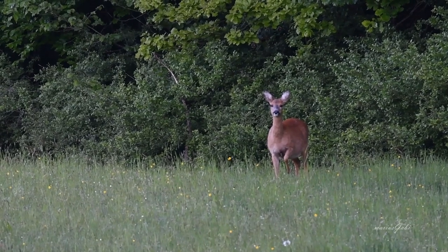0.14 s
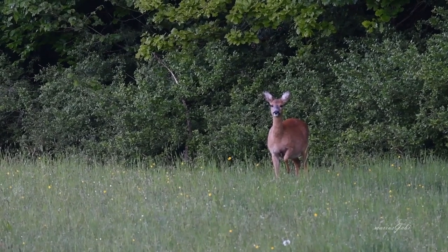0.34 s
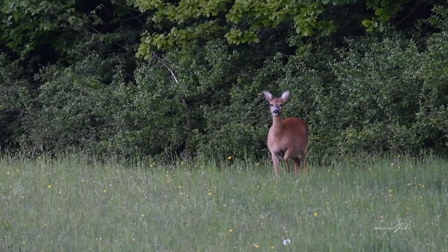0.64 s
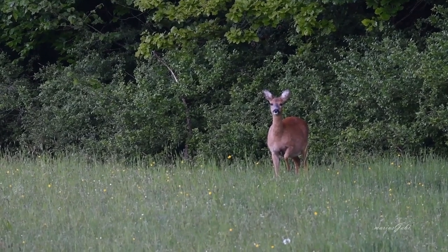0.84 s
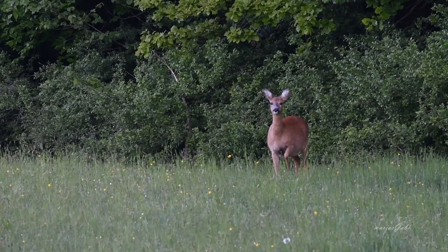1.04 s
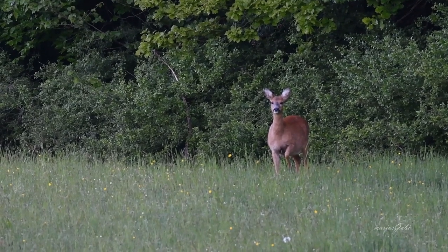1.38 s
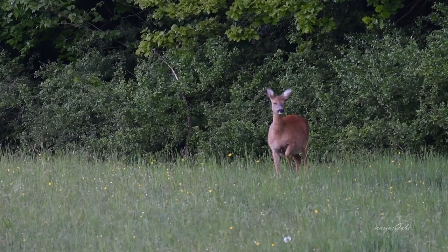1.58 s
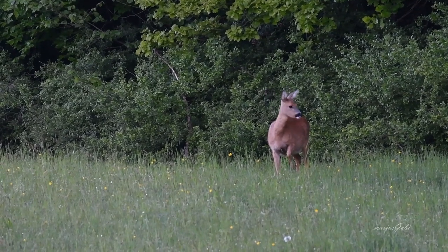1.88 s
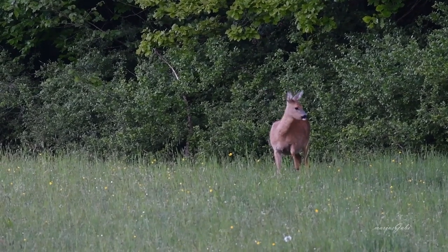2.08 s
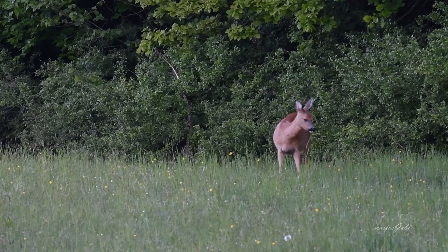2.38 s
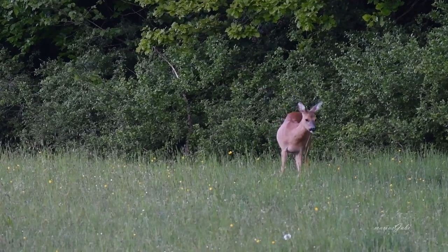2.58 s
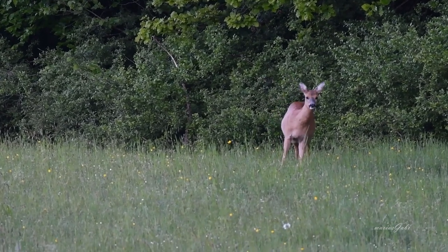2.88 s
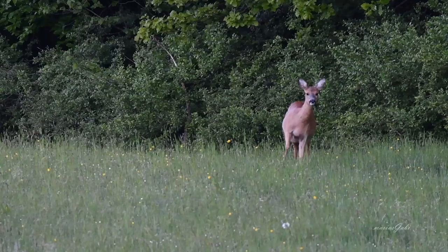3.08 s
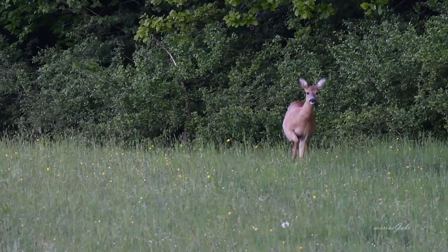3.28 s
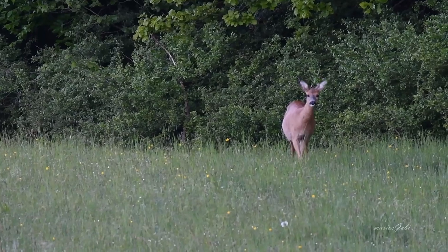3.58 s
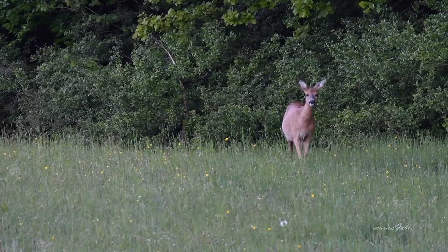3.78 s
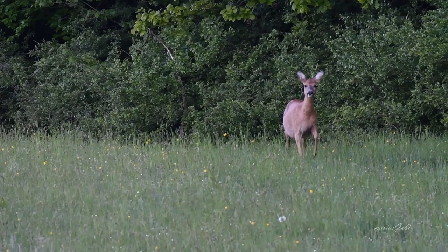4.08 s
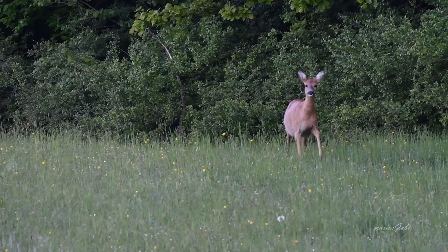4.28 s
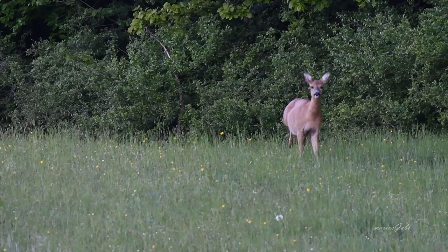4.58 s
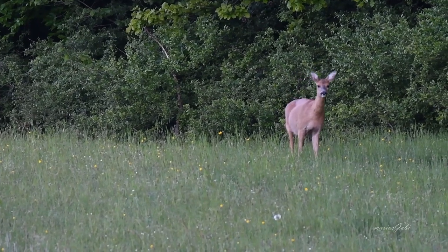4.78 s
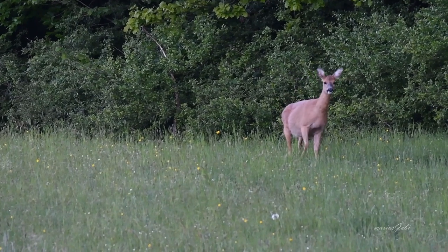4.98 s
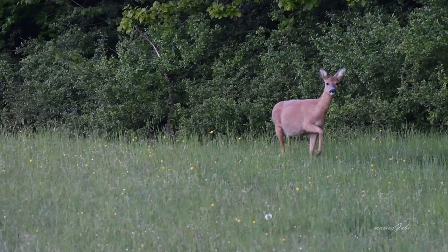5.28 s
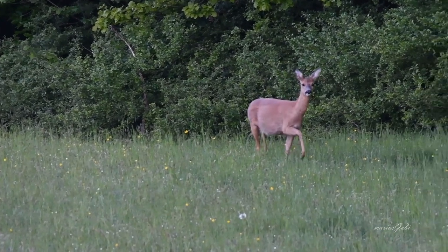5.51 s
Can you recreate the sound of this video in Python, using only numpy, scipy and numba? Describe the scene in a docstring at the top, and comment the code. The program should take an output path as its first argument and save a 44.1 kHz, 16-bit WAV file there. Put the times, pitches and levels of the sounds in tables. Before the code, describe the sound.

A wide stereo outdoor pickup with soft air and microphone hiss. Near and distant songbirds chatter rapidly at first, then give slower, hazier whistles and thin high notes. After this calmer stretch comes one loud, raspy deer bark, under half a second long, sagging in pitch and dulling towards its end. The wood answers with a spreading reverberant tail, and small bird notes follow.

```python
"""A meadow at the edge of a wood: a roe deer gives one hoarse bark, off to the right, and the trees throw it back.
Songbirds near and far sing as gliding whistles, smeared where distant or buzzy; a low call sounds far off.
Uneven throat pulses and gated breath make the bark, with a clean fundamental tone beside them.
A soft noisy haze at 2.9 and 3.7 kHz, made of smeared whistles too, follows the bark.
Below lie bands of noise: a patchy far chorus, faint drones, and the hiss of air and microphones."""
import sys
import numpy as np
from scipy import signal
from scipy.fft import rfft, irfft, next_fast_len
from scipy.io import wavfile
from scipy.ndimage import uniform_filter1d
from numba import njit

SR = 44100
rng = np.random.default_rng(int(sys.argv[2]) if len(sys.argv) > 2 else 0)


def store_pcm(level_fs):
    """Save levels as 16-bit WAV."""
    pcm = np.round(np.clip(level_fs, -1, 1) * 32767).astype(np.int16)
    wavfile.write(sys.argv[1], SR, np.atleast_2d(pcm).T)


N = 249165


def from_db(db):
    """Turn decibels into a gain."""
    return 10 ** (np.asarray(db) / 20)


def rms_one(x):
    """Scale to an rms of 1."""
    return x / np.sqrt(np.mean(x ** 2) + 1e-20)


def in_time(s, length, edge_s):
    """A gate that is open for a while, with straight edges."""
    t = np.arange(N) / SR - s
    return np.clip(np.minimum(t, length - t) / edge_s, 0, 1)


def at_hz(points, hz):
    """Read a table's second column at any frequency, straight over log frequency."""
    table_hz, values = np.transpose(points)
    return np.interp(np.log(hz), np.log(table_hz), values)


def drift(rate_hz, size=N):
    """Slow chance: noise twice through a one-pole low-pass, run in; rms 1."""
    r = np.exp(-2 * np.pi * rate_hz / SR)
    run_in = 4000
    slow = signal.lfilter([1], [1, -2 * r, r * r], rng.standard_normal(size + run_in))
    return rms_one(slow[run_in:])


def stereo(mid, side, alike):
    """Mix two independent noises into left and right with a given likeness."""
    return np.sqrt(1 + alike) * mid + np.sqrt(1 - alike) * side * [[1], [-1]]


@njit
def resonate(x, hz, r, sr):
    """A resonance whose centre moves; gain 1 on top."""
    y = np.zeros(len(x))
    for i in range(2, len(x)):
        driven = (1 - r * r) / 2 * (x[i] - x[i - 2])
        y[i] = driven + 2 * r * np.cos(2 * np.pi * hz[i] / sr) * y[i - 1] - r * r * y[i - 2]
    return y


def air():
    """Hiss of air and microphones: steady stereo noise shaped in level and left-right likeness."""
    # spectrum of the hiss: hz, relative level_db per Hz
    spectrum = [(12, -54), (20, -12.5), (101, 0), (153, -0.5), (316, -4), (441, -3), (582, -6), (885, -6),
                (1270, -8), (1980, -10.5), (3770, -10.5), (6400, -15.5), (7560, -21), (10300, -15),
                (15600, -16)]
    # how alike the two microphones hear it: hz, likeness (1 = identical)
    likeness = [(60, 0.59), (180, 0.48), (550, 0.049), (1650, 0.035), (4970, 0.0093), (15000, 0.019)]
    size = next_fast_len(N)
    hz = np.maximum(np.fft.rfftfreq(size, 1 / SR), 1)
    mid, side = rfft(rng.standard_normal((2, size)))
    both = from_db(at_hz(spectrum, hz)) * stereo(mid, side, at_hz(likeness, hz))
    return from_db(-56.5) * rms_one(irfft(both, size)[:, :N])


def drones():
    """Faint narrow bands of noise with wavering level; the high one is likely insects."""
    # drone bands: centre_hz, width_hz, level_db before the wavering
    drone_bands = [(878, 22, -76.5), (6240, 97, -78.5)]
    out = 0
    for hz, width_hz, level_db in drone_bands:
        r = np.exp(-np.pi * width_hz / SR)
        poles = [1, -2 * r * np.cos(2 * np.pi * hz / SR), r * r]
        band = signal.lfilter([1, 0, -1], poles, rng.standard_normal((2, N)))
        out = out + from_db(level_db + 2.7 * drift(1.5)) * rms_one(band)
    return out


def far_chorus():
    """Many far birds melt into a patchy shimmer: bands of noise that swell and sink on their own."""
    # shimmer bands: centre_hz, level_db (rms of the band before the swells)
    chorus_bands = [(2000, -71.5), (2600, -80), (3400, -75.5), (4400, -80.5), (5700, -75.5)]
    swell_db, swell_hz = 2.5, 3.5
    white = rng.standard_normal((2, N))
    out = 0
    for hz, level_db in chorus_bands:
        sos = signal.butter(4, [hz / 1.102, hz * 1.077], "band", fs=SR, output="sos")
        band = signal.sosfilt(sos, white)
        out = out + from_db(level_db + swell_db * drift(swell_hz)) * rms_one(band)
    return out


def low_call():
    """A wavering coo, blurred by distance: noise through a resonance 40 Hz wide."""
    # low far calls: start_s, length_s, pitch_hz, level_db
    low_calls = [(1.35, 0.5, 271, -64.5), (1.95, 0.17, 265, -63)]
    level = sum(from_db(db) * in_time(s, length, edge_s=.06) for s, length, hz, db in low_calls)
    s, length, hz, db = np.transpose(low_calls)
    pitch_hz = np.interp(np.arange(N) / SR, s + length / 2, hz)
    coo = resonate(rng.standard_normal(N), pitch_hz, np.exp(-np.pi * 40 / SR), SR)
    return level * rms_one(coo)


def bands():
    """Half-octave band filters from 160 Hz up, with their centres."""
    edges = 20 * 2 ** np.arange(3, 10, .5)
    return [(np.sqrt(low * high), signal.butter(2, [low, high], "band", fs=SR, output="sos"))
            for low, high in zip(edges, edges[1:])]


def wood(x, onset_s, early_db, early_t60):
    """Trunks and leaves scatter sound back: a quick near part and a slower tail, alike in the bass only."""
    # dying away of the tail: hz, t60_s (time to fall by 60 dB)
    tail_t60 = [(300, 2.34), (700, 2.08), (1400, 1.89), (2400, 1.34), (4000, 1.26), (8000, 1.25)]
    t = np.arange(int(1.2 * SR)) / SR
    white, echo = rng.standard_normal((2, len(t))), 0
    for hz, sos in bands():
        mid, side = signal.sosfilt(sos, white)
        alike = 1 / (1 + (hz / 700) ** 2)
        tail = from_db(-60 * t / at_hz(tail_t60, hz))
        early = from_db(early_db - 60 * t / early_t60)
        echo = echo + (tail + early) * stereo(mid, side, alike)
    build_up = 1 - np.exp(-t / onset_s)
    return signal.fftconvolve(x, echo * build_up / np.sqrt(SR), axes=-1)[:, :N]


def birds_and_haze():
    """Each note is a gliding whistle, smeared over its blur width if far, buzzy or part of the haze."""
    # bird notes and two strokes of haze: kind, start_s, length_s, start_hz, bend_hz, end_hz, level_db
    notes = [("far", 0.002, 0.035, 2850, 2800, 2870, -52), ("near", 0.01, 0.09, 2350, 2720, 3190, -43.5),
             ("ahead", 0.1, 0.13, 3150, 3180, 3150, -60), ("ahead", 0.155, 0.024, 2330, 2380, 2150, -46),
             ("near", 0.181, 0.14, 3720, 3800, 3880, -53), ("near", 0.245, 0.035, 3780, 3600, 3400, -43),
             ("far", 0.282, 0.04, 3450, 3600, 3650, -47), ("near", 0.311, 0.042, 3150, 2650, 2100, -53),
             ("near", 0.374, 0.057, 3450, 3314, 3100, -44), ("ahead", 0.409, 0.055, 4800, 4560, 4560, -47),
             ("left", 0.46, 0.05, 4500, 4200, 4050, -59), ("far", 0.487, 0.03, 3250, 3230, 3250, -49),
             ("near", 0.522, 0.06, 3300, 3520, 3650, -44), ("buzz", 0.595, 0.06, 3550, 3550, 3400, -47),
             ("far", 0.691, 0.02, 4330, 4000, 3650, -55), ("churr", 0.698, 0.19, 3850, 3800, 3700, -52),
             ("near", 0.841, 0.076, 3680, 3400, 3420, -43), ("far", 0.905, 0.094, 3420, 3430, 3410, -46),
             ("near", 1.012, 0.034, 2100, 2560, 2860, -43.5), ("near", 1.05, 0.016, 3080, 3230, 3170, -41),
             ("far", 1.06, 0.024, 2900, 2800, 2620, -49), ("left", 1.062, 0.026, 3850, 4050, 4300, -51),
             ("near", 1.082, 0.052, 2580, 2310, 2250, -42.5), ("buzz", 1.085, 0.078, 3800, 3800, 3800, -48),
             ("near", 1.187, 0.04, 3300, 3115, 3090, -43), ("near", 1.323, 0.025, 2230, 2560, 2880, -42),
             ("left", 1.34, 0.012, 3800, 4000, 4150, -56), ("ahead", 1.355, 0.033, 4750, 4350, 3950, -54),
             ("near", 1.357, 0.032, 3000, 3080, 3050, -49), ("near", 1.392, 0.036, 3000, 2700, 2300, -46),
             ("far", 1.416, 0.03, 2950, 3050, 3020, -51), ("far", 1.438, 0.018, 2250, 2100, 1950, -53),
             ("far", 1.465, 0.06, 2050, 2000, 1930, -56), ("buzz", 1.442, 0.035, 5800, 5630, 5450, -62),
             ("near", 1.51, 0.03, 3400, 3500, 3200, -51), ("far", 1.54, 0.075, 3050, 3030, 3050, -57),
             ("churr", 1.553, 0.022, 4100, 3900, 3700, -54), ("left", 1.635, 0.02, 3230, 3300, 3500, -51),
             ("buzz", 1.65, 0.03, 3700, 3800, 3650, -48), ("far", 1.798, 0.23, 2050, 2044, 2020, -70),
             ("ahead", 1.898, 0.016, 3220, 3200, 3250, -53), ("churr", 1.974, 0.09, 4450, 4600, 4460, -66),
             ("churr", 2.045, 0.19, 3750, 3715, 3660, -51), ("churr", 2.197, 0.08, 2150, 2050, 1950, -62),
             ("far", 2.243, 0.15, 2163, 1992, 1890, -54), ("far", 2.438, 0.21, 1883, 1769, 1704, -54),
             ("high", 2.628, 0.14, 8500, 8000, 7700, -68.5), ("far", 2.642, 0.15, 2380, 2280, 2116, -52),
             ("high", 2.766, 0.14, 7600, 7340, 7250, -64.5), ("churr", 2.836, 0.035, 6800, 6100, 5600, -67),
             ("far", 2.842, 0.083, 1960, 1930, 1900, -53), ("buzz", 2.84, 0.14, 5520, 5300, 5200, -61.5),
             ("distant", 2.921, 0.11, 4720, 4720, 4780, -53), ("churr", 2.954, 0.45, 4350, 4104, 4000, -58),
             ("left", 3.08, 0.02, 2750, 2830, 2870, -55.5), ("left", 3.118, 0.027, 1450, 1400, 1380, -59),
             ("far", 3.204, 0.18, 2022, 2085, 2200, -66), ("far", 3.331, 0.095, 3020, 3120, 3150, -64),
             ("far", 3.34, 0.17, 2850, 2810, 2780, -61), ("high", 3.467, 0.1, 7400, 7140, 6900, -70),
             ("high", 3.56, 0.24, 6880, 6620, 6530, -61), ("far", 3.588, 0.1, 2370, 2490, 2424, -55.5),
             ("far", 3.727, 0.042, 2480, 2525, 2440, -61), ("distant", 3.744, 0.52, 4390, 4364, 4400, -53),
             ("churr", 3.9, 0.1, 4600, 4660, 4600, -64), ("ahead", 4.117, 0.03, 1400, 1330, 1300, -62.5),
             ("far", 4.15, 0.12, 2850, 2875, 2900, -64), ("left", 4.292, 0.14, 3450, 3350, 3330, -59),
             ("far", 4.404, 0.042, 2400, 2420, 2500, -65), ("left", 4.87, 0.089, 3310, 3247, 3230, -55.5),
             ("churr", 5.0, 0.28, 3650, 3700, 3750, -59.5), ("churr", 5.06, 0.22, 2850, 2850, 2900, -60),
             ("ahead", 5.005, 0.03, 6264, 6000, 5590, -68), ("ahead", 5.048, 0.13, 3150, 3060, 3000, -62),
             ("left", 5.309, 0.055, 4750, 4320, 4300, -59), ("ahead", 5.35, 0.118, 3820, 3850, 3890, -49),
             ("ahead", 5.564, 0.055, 4720, 4520, 4540, -49), ("churr", 5.562, 0.04, 4800, 4650, 4550, -57)]
    # kinds of note: left_minus_right_db, blur_hz, send_db (into the wood, relative to the note)
    kinds = {"near": (-8, 12, 7), "far": (-9.5, 80, 9), "high": (-9, 120, 10), "ahead": (-2, 25, 1.5),
             "distant": (-3, 75, 9), "left": (3, 60, 5), "churr": (-5.5, 430, 7), "buzz": (1.5, 300, 4)}
    # the strokes at 5.0 and 5.06 s are no singer but a soft noisy wash in the bark's tail
    kinds = {**kinds, "haze": kinds["churr"]}
    notes = [("haze", *note[1:]) if note[1] in (5.0, 5.06) else note for note in notes]
    bend_place = .47   # share of a note before its glide bends
    flutter_hz, flutter_share = 30, .07   # leaves and air make even near notes flutter
    # a run of even buzzy notes, each a little higher
    buzz_s, spacing_s, buzz_length_s, buzz_db = .044, .153, .072, -59.5
    glide_hz, step_hz = (5450, 5190, 5040), 60
    buzzes = [("buzz", buzz_s + k * spacing_s, buzz_length_s, *np.add(glide_hz, k * step_hz), buzz_db)
              for k in range(4)]
    out = np.zeros((2, 2, N))      # heard straight, sent to the wood
    for kind, s, length, start_hz, bend_hz, end_hz, level_db in buzzes + notes:
        pan_db, blur_hz, send_db = kinds[kind]
        u = np.linspace(0, 1, int(length * SR))
        glide = np.interp(u, [0, bend_place, 1], [start_hz, bend_hz, end_hz])
        hz = uniform_filter1d(glide, len(u) // 3, mode="nearest")
        rate_hz = blur_hz / 2 + flutter_hz
        smear = drift(rate_hz, size=len(u)) + 1j * drift(rate_hz, size=len(u))
        share = np.clip(blur_hz / 200 + flutter_share, 0, 1)
        envelope = np.sqrt(2 - 2 * share) + np.sqrt(share) * smear   # steady part and smeared part
        whistle = np.real(envelope * np.exp(2j * np.pi * np.cumsum(hz) / SR))
        swell = np.sin(np.pi * u ** 0.7) ** 0.3
        gains = from_db(level_db + np.array([[.5], [-.5]]) * pan_db)
        at = round(s * SR)
        note = (gains * swell * whistle)[:, :N - at]
        out[:, :, at:at + len(u)] += [note, from_db(send_db) * note]
    return out


def throat(source, hz, width_hz):
    """One resonance passed twice, the second time wider, for dark valleys; its slow level swings are evened."""
    r = np.exp(-np.pi * width_hz / SR)
    once = resonate(source, hz, r, SR)
    rung = rms_one(resonate(once, hz, r ** 2.48, SR))
    return rung / np.sqrt(uniform_filter1d(rung ** 2, size=3000) + 0.23)


def bark():
    """Overblown folds: uneven pulses and breath gated by them ring in the throat; the fundamental stays clean."""
    # upper throat and mouth resonances: centre_hz, width_hz (first pass), level_db before rasp and brightness,
    # gape_lift (share by which the open mouth raises it), start_rise_hz (how much higher it starts)
    resonances = [(1350, 185, 2, .065, 70), (2050, 210, -2.5, .01, 240), (2480, 240, -16, .01, 50),
                  (3500, 1050, -18.5, .03, 10), (5400, 1000, -45, .03, 10)]
    start_s, attack_s, hold_s, release_s = 4.559, .022, .335, .035
    t = np.arange(N) / SR - start_s
    lasts = attack_s + hold_s + release_s
    gate, done = in_time(start_s, lasts, edge_s=.0054), np.clip(t / lasts, 0, 1)

    # effort: a rise of 22 dB, a slow fade of 4 dB per second, a fall of 10 dB
    rise_db = -22 * np.clip(1 - t / attack_s, 0, 1)
    fall_db = -10 * np.clip(1 - (lasts - t) / release_s, 0, 1)
    effort_db = -35 - 4 * done * lasts + rise_db + fall_db
    throb_hz, throb_depth_db, throb_peak_s, throb_fade_s = 22, 2.3, 4.612, .11
    since = np.arange(N) / SR - throb_peak_s
    throb_db = throb_depth_db * np.cos(2 * np.pi * throb_hz * since) * np.exp(-np.abs(since) / throb_fade_s)

    # the folds slacken: the sag grows with the square of time
    pitch_hz = 213 - 52 * done ** 2
    # the clean fundamental locks in late and weakens as they slacken
    tone_lag_s = .045
    tone_db = -51 - 12 * done ** 2 - 20 * np.clip(2 - 2 * t / tone_lag_s, 0, 1)

    # the mouth opens, then shuts
    widest_s, gape_rise_s, gape_fall_s = 4.71, .09, .15
    wide = t + start_s - widest_s
    gape = np.exp(-(wide / np.where(wide < 0, gape_rise_s, gape_fall_s)) ** 2)

    cycles = np.cumsum(pitch_hz * (1 + .12 * drift(150))) / SR
    pulses = np.diff(np.floor(cycles), prepend=0) * from_db(4 * drift(200))   # uneven in time and strength
    breath = rng.standard_normal(N) * np.exp(-2.5 * (cycles % 1))   # dies down within each cycle
    source = 0.36 * rms_one(pulses) + rms_one(breath)

    rasp_db = -1.5 + 3 * done   # resonances above 2 kHz gain on the 1350 Hz one
    upper = 0
    for k, (hz, width_hz, level_db, gape_lift, start_rise_hz) in enumerate(resonances):
        centre_hz = hz * (1 + gape_lift * gape) + start_rise_hz * (1 - done) ** 2
        gain = from_db(level_db + rasp_db * (k > 0))
        upper = upper + (-1) ** k * gain * throat(source, centre_hz, width_hz)   # signs alternate
    bright_db = 6.5 - 11 * done   # upper resonances dull over the bark
    jaw_shut_hz, jaw_open_hz, jaw_width_hz = 675, 728, 150   # lowest resonance moves with the jaw
    jaw_hz = jaw_shut_hz + (jaw_open_hz - jaw_shut_hz) * gape
    voice = from_db(bright_db) * upper - throat(source, jaw_hz, jaw_width_hz)

    sine = np.sqrt(2) * np.sin(2 * np.pi * np.cumsum(pitch_hz) / SR)
    tone = sine * from_db(tone_db + 1.5 * drift(30))
    tone += from_db(tone_db - 6) * throat(source, pitch_hz * 1.2, 74)   # unsteady cycles blur its upper side
    return gate * from_db(effort_db + throb_db) * voice, gate * tone


def scene():
    """Deer voice, birds and haze reach the left microphone later, the deer also duller; the wood answers all."""
    deer_lag, bird_lag = 5, 7   # samples by which the left microphone hears them later
    voice, tone = bark()
    low_part = signal.sosfilt(signal.butter(2, 1100, fs=SR, output="sos"), voice)
    deer = from_db(1.5) * np.array([0.46 * low_part + 0.5 * voice, voice])
    deer[0] = np.roll(deer[0], deer_lag)
    song, sent = birds_and_haze()
    song[0] = np.roll(song[0], bird_lag)
    deer_echo = from_db(5.5) * wood(deer + 0.23 * tone, onset_s=0.063, early_db=6.5, early_t60=0.54)
    song_echo = wood(sent, onset_s=0.021, early_db=11.5, early_t60=0.11)
    background = air() + drones() + far_chorus() + low_call()
    return background + song + song_echo + deer + tone + deer_echo


def record(dry):
    """The top is cut steeply: 70 dB down from 16 kHz up."""
    return signal.sosfilt(signal.cheby2(24, 70, 16000, fs=SR, output="sos"), dry)


dry = scene()
out = record(dry)
store_pcm(out)
```